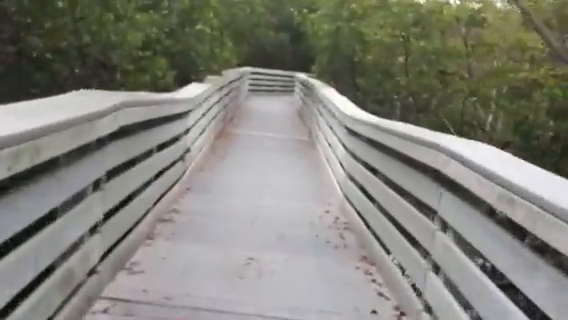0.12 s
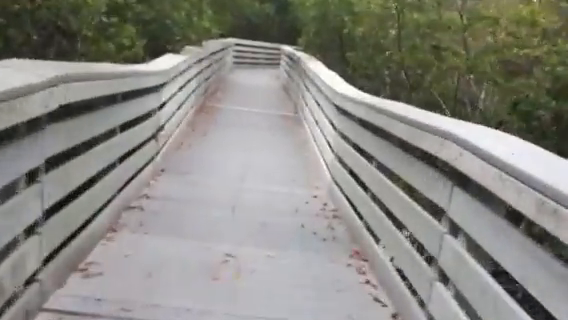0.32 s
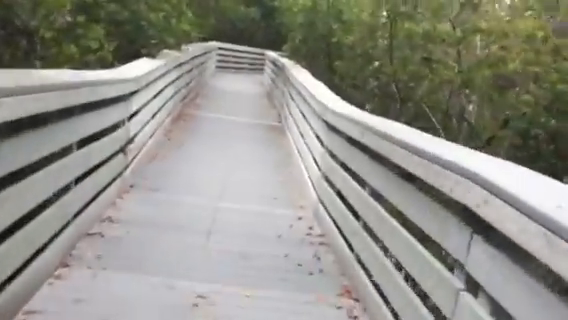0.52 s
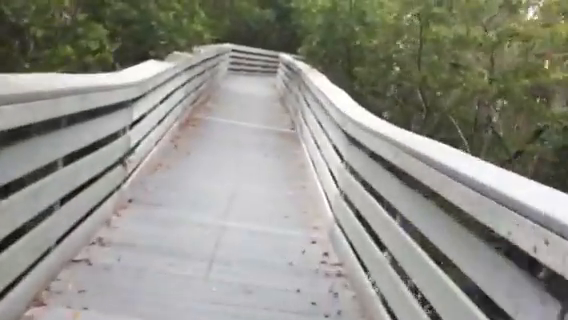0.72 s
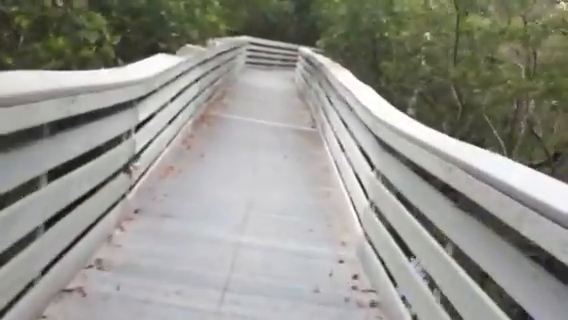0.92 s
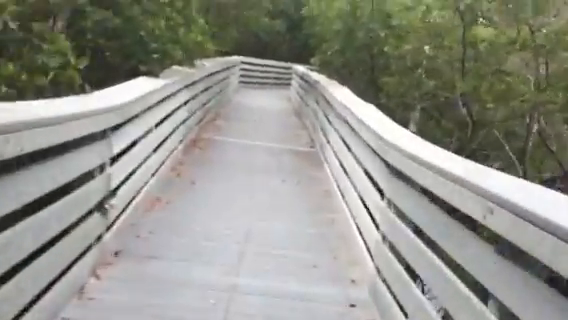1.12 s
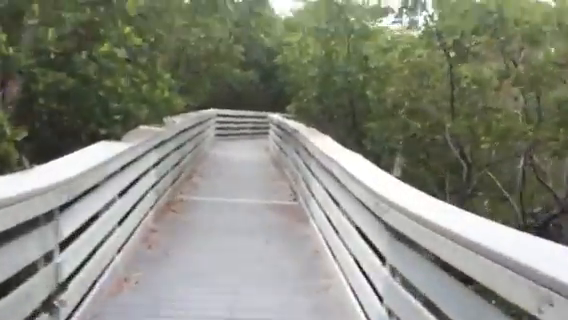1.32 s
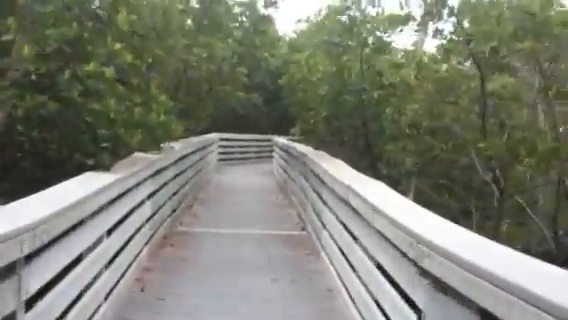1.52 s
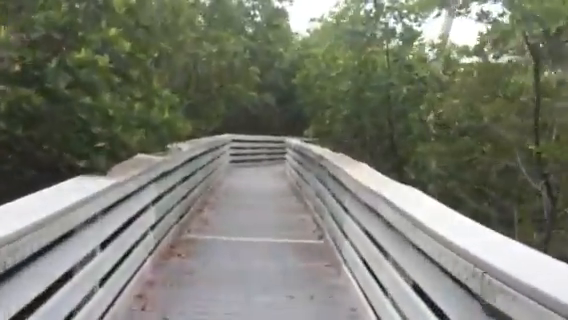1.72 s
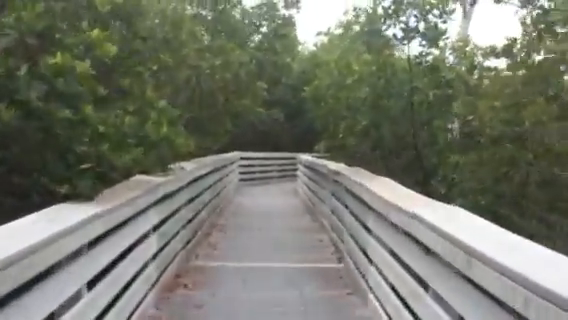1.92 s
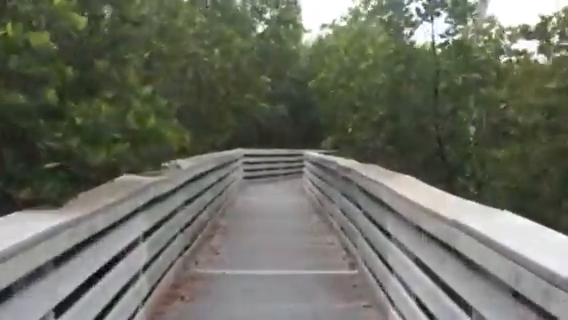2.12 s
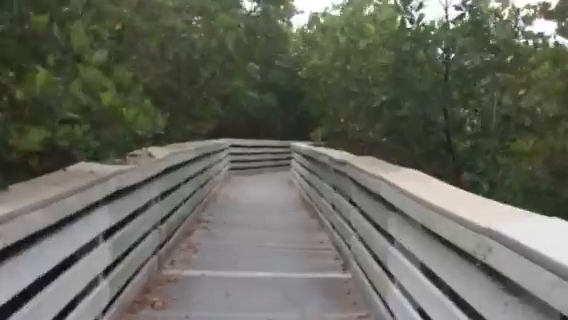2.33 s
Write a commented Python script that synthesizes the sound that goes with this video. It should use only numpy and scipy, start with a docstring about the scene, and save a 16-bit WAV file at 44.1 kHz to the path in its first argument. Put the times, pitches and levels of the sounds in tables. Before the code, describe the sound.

A bicycle rolls along a wooden boardwalk, heard from the saddle. The tyres rumble and thump softly over planks. Early on, a loose part clacks hard and rattles, then faint chain ticks and a small metal click follow.

```python
"""A bicycle rolls along a wooden boardwalk, heard from the saddle.
From the start the tyres rumble, thump over the planks and scuff on grit, and the chain ticks softly
over its sprocket. At 0.23 s a bump makes a loose part clack hard, and small parts rattle after it.
From 1.1 s the drive squeaks faintly; near 1.6 s a smaller metal part clicks, and the ride rolls on.
All along, railings and trees give the bicycle's small noises a light echo."""
import sys
import numpy as np
from scipy import signal
from scipy.fft import rfft, irfft, next_fast_len
from scipy.io import wavfile
from scipy.ndimage import uniform_filter1d, map_coordinates

SR = 44100
rng = np.random.default_rng(int(sys.argv[2]) if len(sys.argv) > 2 else 0)


def store_pcm(level_fs):
    """Save levels as 16-bit WAV."""
    pcm = np.round(np.clip(level_fs, -1, 1) * 32767).astype(np.int16)
    wavfile.write(sys.argv[1], SR, np.atleast_2d(pcm).T)


N = 105840


def rumble():
    """The rolling tyres make a low rumble, and the frame resonates under them with a wavering tone."""
    # colour of the rumble (frequency [Hz], level [dB per Hz])
    colour = [(20, -43.5), (35, -28), (48, -13), (59, 0.5), (72, -3.5), (100, -7), (150, -6.5), (190, -5.5),
              (250, -16.5), (400, -29), (700, -53), (1500, -96.5)]
    # swell of rumble and boom together (time [s], level [dB])
    swell = [(0.0, -40.5), (0.12, -47.5), (0.31, -45), (0.42, -45), (0.54, -45.5), (0.57, -49.5),
             (0.67, -44.5), (0.82, -45.5), (0.97, -47.5), (1.14, -45.5), (1.38, -47), (1.5, -45.5),
             (1.64, -50.5), (1.77, -50), (2.19, -46), (2.28, -50), (2.4, -42)]
    boom_hz, boom_db = 59, -14.5
    t = clock()
    low = noise(colour)
    local_power = np.abs(uniform_filter1d(low ** 2, size=3300))
    bed = unit(low / np.sqrt(local_power + 1e-6))  # levelled over 75 ms for an even roll
    tone = np.sin(2 * np.pi * boom_hz * t + 0.76 * wobble(5.55))
    boom = unit(tone * amp(12.0 * wobble(7.3)))
    return (bed + amp(boom_db) * boom) * amp(curve(swell, t))


def planks():
    """A plank knocked by a wheel thumps for a few low cycles."""
    # plank knocks (time [s], level [dB], pitch [Hz], t60 [s])
    thumps = [(0.191, -32.5, 195, 0.086), (.329, -24.5, 178, 0.11), (0.369, -32, 127, 0.14),
              (0.621, -31, 165, 0.08), (.672, -32.5, 62.4, 0.2), (1.157, -26.5, 85, .05),
              (1.19, -28.5, 69.4, 0.063), (1.196, -30.5, 141, 0.067), (1.258, -26.5, 93, 0.045),
              (1.295, -25, 94, 0.043), (1.331, -27.5, 84, 0.062), (1.358, -22, 78, 0.06),
              (1.387, -32.5, 153, .08), (1.574, -33, 70, 0.093), (1.66, -33, 90, 0.067),
              (2.243, -26.5, 77.8, 0.097)]
    rise_s = 0.0039
    out = np.zeros(N)
    for s, db, hz, t60 in thumps:
        t = np.maximum(clock() - s, 0)
        attack = 1 - np.exp(-t / rise_s)
        out += amp(db) * attack * fade(t, t60) * np.sin(2 * np.pi * hz * t)
    return out


def clack():
    """A loose part slaps and bounces: each contact cracks and rings, and it chatters in between."""
    # the slap and its bounces (time [s], level [dB])
    contacts = [(.2327, -4.5), (.2341, -18), (.2353, -34), (.2411, -14), (.247, -22), (.2477, -24)]
    # heavily damped resonances of the impact (frequency [Hz], level [dB], t60 [s])
    crack_modes = [(894, -17, .014), (1945, -13, 0.0058), (2800, -9.5, 0.0054), (3450, -4, 0.0074),
                   (4170, -2.5, 0.0038), (7090, -7, 0.0032), (12640, -2.5, 0.0021)]
    # longer ring of the part (frequency [Hz], level [dB], t60 [s])
    ring_modes = [(1030, -40.5, 0.046), (1235, -26, 0.052), (1694, -22, 0.027), (2434, -24, 0.04),
                  (2840, -33.5, 0.061), (3070, -25, 0.049), (3236, -24, .12), (3420, -28, 0.12),
                  (3540, -32, 0.041), (3820, -33, .04), (4340, -33, .05), (5110, -36.5, 0.088)]
    # burst of chatter (time [s], level [dB], hold [s])
    chatter = [(.234, -29.5, 0.01)]
    # colour of the chatter (frequency [Hz], level [dB per Hz])
    colour = [(150, -20.5), (300, 2.5), (580, -9.5), (780, -5), (1150, -1), (1450, -5.5), (2000, -6.5),
              (3400, 1.5), (4500, -3.5), (5700, -6), (7000, -11.5), (9500, -5), (12500, -14), (15500, -10)]
    snap = bursts(chatter, rise_s=0.00046, t60=0.037)
    tail = amp(-12) * bursts(chatter, rise_s=0.0033, t60=0.21)
    return ring(contacts, crack_modes) + ring(contacts, ring_modes) + noise(colour) * (snap + tail)


def rattle():
    """Small parts shake in brief, bright flurries, loudest after the bump."""
    # flurries (time [s], level [dB], hold [s])
    shakes = [(.358, -60, 0.0075), (.424, -51, 0.014), (.439, -46, 0.0026), (.444, -46, 0.0042),
              (.450, -56, 0.0027), (.52, -65, 0.014), (1.079, -61, 0.0013), (1.6, -62.5, 0.04)]
    # colour of the rattle (frequency [Hz], level [dB per Hz])
    colour = [(400, -25), (1800, 2), (4000, 0), (6000, 4.5), (9000, -3.5), (13000, -3), (15500, -9)]
    flurries = noise(colour) * bursts(shakes, rise_s=0.0013, t60=0.13)
    flutter = unit(amp(2.2 * wobble(460)))
    return flurries * flutter


def clicks():
    """A small metal part chatters; its hardest contact leaves a brief ring."""
    # contacts of the part (time [s], level [dB])
    contacts = [(1.5625, -52), (1.564, -45), (1.566, -33.5), (1.569, -42)]
    # colour of the clicks (frequency [Hz], level [dB per Hz])
    colour = [(500, -31), (1700, -15), (2800, -1.5), (3800, 4), (5000, -3), (7000, -13.5), (9000, -18),
              (15000, -36)]
    # ring of the metal (frequency [Hz], level [dB], t60 [s])
    modes = [(3080, -19, 0.066), (3260, -9, 0.036), (3830, -7.5, 0.057), (4340, -12, 0.042),
             (5240, -23, 0.115)]
    strikes = bursts([(s, db, 0) for s, db in contacts], rise_s=0.00029, t60=0.027)
    hardest = max(contacts, key=lambda row: row[1])
    return noise(colour) * strikes + ring([hardest], modes)


def taps():
    """Pebbles of grit ping faintly, each with one short, rough resonance."""
    # taps (time [s], level [dB], pitch [Hz])
    hits = [(0.122, -54.5, 4240), (.471, -46, 1750), (1.64, -54, 3390), (1.725, -53.5, 4300),
            (1.797, -56, 1900), (2.006, -52.5, 3450), (2.016, -50, 3810), (2.253, -55.5, 3900)]
    t, out = clock(), np.zeros(N)
    for s, db, hz in hits:
        rough_tone = np.sin(2 * np.pi * hz * t + 1.7 * wobble(1200))
        out += amp(db) * fade(t - s, t60=0.04) * rough_tone
    return out


def chain():
    """Each link seats on the sprocket with a soft tick and leaves it with a softer one."""
    # chain travel (time [s], links passed [count])
    travel = [(-.009, -1), (.19, 3), (.326, 6), (.58, 12), (.728, 15), (.896, 19), (1.042, 22), (1.224, 26),
              (1.372, 29), (1.674, 35), (1.836, 38), (1.883, 39), (2.004, 42), (2.047, 43), (2.147, 45),
              (2.284, 48), (2.406, 51)]
    # strength of the ticks (time [s], level [dB])
    strength = [(0, -60.5), (.6, -59), (.9, -61.5), (1.08, -62.5), (1.22, -56), (1.38, -56.5), (1.5, -58.5),
                (1.78, -65), (2, -60.5), (2.15, -57.5), (2.4, -61)]
    # colour of a tick (frequency [Hz], level [dB per Hz])
    colour = [(500, -18), (2000, 4), (3500, -1), (4800, -7), (6200, -5), (8900, 1), (10500, 0.5),
              (13300, -7), (15000, -0.5)]
    lead_s, hold_s, scatter_db = 0.0072, 0.0038, 1.5
    exit_delay_s, exit_db = 0.027, -15
    s, links = np.transpose(travel)
    times = np.interp(np.arange(0, links[-1] + 1), links, s) - lead_s
    levels = curve(strength, times) + scatter_db * rng.standard_normal(len(times))
    seats = [(at, db, hold_s) for at, db in zip(times, levels)]
    exits = [(at + exit_delay_s, db + exit_db, hold) for at, db, hold in seats]
    return noise(colour) * bursts(seats + exits, rise_s=0.004, t60=0.066)


def tread():
    """The tread hisses softly on the wood."""
    # colour of the hiss (frequency [Hz], level [dB per Hz])
    colour = [(100, 4), (400, 0.5), (850, -4), (1400, -9), (2200, -14), (3600, -18), (5200, -22.5),
              (9000, -21), (12300, -22), (15500, -26.5)]
    # swell of the hiss (time [s], level [dB])
    swell = [(0, -58), (.55, -56), (.72, -59.5), (1.2, -58), (1.75, -60.5), (2.1, -59), (2.4, -59.5)]
    return noise(colour) * amp(curve(swell, clock()) + wobble(70))


def grit():
    """Grit under the tyres gives short, grainy scuffs."""
    # scuffs (time [s], level [dB], hold [s])
    scuffs = [(.045, -54.5, 0.018), (.121, -54, 0.0057), (.470, -61, 0.0018), (.621, -60.5, 0.0016),
              (.817, -55, 0.024), (1.022, -53.5, 0.0039), (1.123, -60, 0.026), (1.211, -53.5, 0.0035),
              (1.640, -57.5, 0.0093), (1.798, -61, 0.0021), (2.124, -61, 0.0031)]
    # colour of the grit (frequency [Hz], level [dB per Hz])
    colour = [(250, 0.5), (800, 7), (1800, 1), (3000, -4), (4500, -8.5), (7000, -15), (15000, -30)]
    scrape = noise(colour) * bursts(scuffs, rise_s=0.00066, t60=0.063)
    grain = unit(amp(2.3 * wobble(550)))
    return scrape * grain


def squeaks():
    """Rubbing metal in the drive rasps faintly and sings on two narrow resonances."""
    # rubs (time [s], level [dB], hold [s])
    rubs = [(1.123, -63, 0.005), (1.141, -61.5, 0.0097), (1.212, -63.5, 0.0039), (1.404, -62.5, 0.0074)]
    # singing resonances (frequency [Hz], level [dB])
    modes = [(6620, 0.5), (12180, 0)]
    # colour of the rasp (frequency [Hz], level [dB per Hz])
    colour = [(1500, 0), (5000, -14), (8500, -1), (11500, 0), (13500, -13), (15500, -12)]
    tone = sum(amp(db) * np.sin(2 * np.pi * hz * clock() + wobble(190)) for hz, db in modes)
    rasp = amp(-0.5) * noise(colour) * bursts(rubs, rise_s=0.0016, t60=0.13)
    return tone * bursts(rubs, rise_s=0.0017, t60=0.06) + rasp


def echo(x, t60):
    """Scattered reflections smear x into a diffuse tail, at unity energy gain."""
    t = np.arange(SR) / SR
    tail = rng.standard_normal(SR) * fade(t, t60) * (1 - np.exp(-t / 0.0025))
    return signal.fftconvolve(x, tail / np.linalg.norm(tail))[:N]


def ring(contacts, modes):
    """Each contact starts the modes from rest, in alternating polarity and at slightly random levels."""
    rise_s, scatter_db = 0.0001, 1.5
    out, t = np.zeros(N + SR), np.arange(SR // 4) / SR
    attack = 1 - np.exp(-t / rise_s)
    for s, db in contacts:
        for k, (hz, level, t60) in enumerate(modes):
            gain = (-1) ** k * amp(db + level + scatter_db * rng.standard_normal())
            out[int(s * SR):][:len(t)] += gain * attack * fade(t, t60) * np.sin(2 * np.pi * hz * t)
    return out[:N]


def bursts(rows, rise_s, t60):
    """Rise-hold-release envelopes from (time [s], level [dB], hold [s]) rows, summed in power."""
    power, t = np.zeros(N + SR), np.arange(SR // 4) / SR
    for s, db, hold in rows:
        shape = np.minimum(t / rise_s, 1) * fade(np.maximum(t - rise_s - hold, 0), t60)
        start = int(np.clip(s * SR, 0, N))
        power[start:start + len(t)] += (amp(db) * shape) ** 2
    return np.sqrt(power[:N])


def noise(colour):
    """Noise of rms 1, shaped by (frequency [Hz], level [dB per Hz]) points."""
    size = next_fast_len(N + 8192)
    hz, db = np.transpose(colour)
    bin_hz = np.fft.rfftfreq(size, 1 / SR)
    gain = amp(np.interp(np.log(bin_hz + 1), np.log(hz), db))
    return unit(irfft(rfft(rng.standard_normal(size)) * gain, size)[:N])


def wobble(rate):
    """A smooth random curve with `rate` knots a second."""
    return map_coordinates(rng.standard_normal(N // 10), [clock() * rate], mode="wrap")


def fade(t, t60):
    """Exponential decay from t = 0, silent before."""
    return (t >= 0) * np.exp(-np.log(1000) * np.maximum(t, 0) / t60)


def curve(rows, t):
    """Straight lines through (time [s], value) rows."""
    return np.interp(t, *np.transpose(rows))


def amp(db):
    """Decibels to gain."""
    return 10 ** (np.asarray(db) / 20)


def unit(x):
    """Scale to rms 1."""
    return x / np.sqrt(np.mean(x ** 2) + 1e-20)


def clock():
    """Time of every sample in seconds."""
    return np.arange(N) / SR


def scene():
    """The bicycle's small noises echo off the railings and trees, over the dry rolling bed."""
    parts = clack() + rattle() + clicks() + taps() + chain() + squeaks()
    railings = amp(-16.5) * echo(parts, t60=0.11)
    trees = amp(-29) * echo(parts, t60=0.75)
    rolling = rumble() + tread() + grit() + planks()
    return (parts + railings + trees + rolling)[None]


def record(dry):
    """A steep low-pass trims the very top of the treble."""
    top_hz, edge_hz = 15480, 400
    size = next_fast_len(N + SR // 2)
    bin_hz = np.fft.rfftfreq(size, 1 / SR)
    gain = np.clip((top_hz - bin_hz) / edge_hz + 0.5, 0, 1)
    return irfft(rfft(dry, size) * gain, size)[:, :N]


dry = scene()
out = record(dry)
store_pcm(out)
```